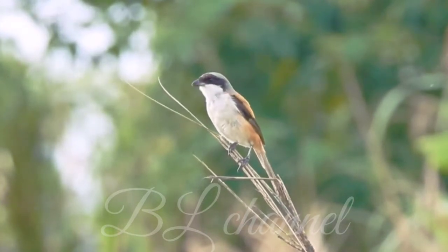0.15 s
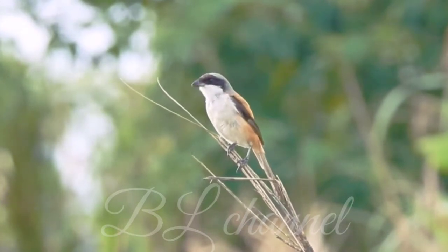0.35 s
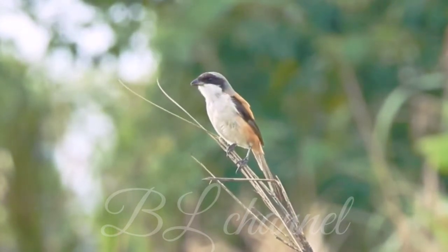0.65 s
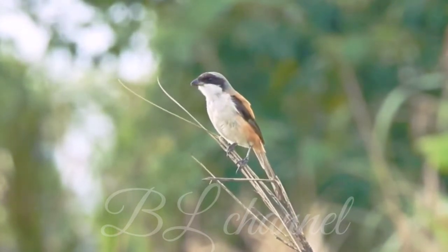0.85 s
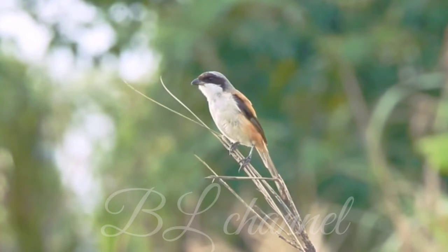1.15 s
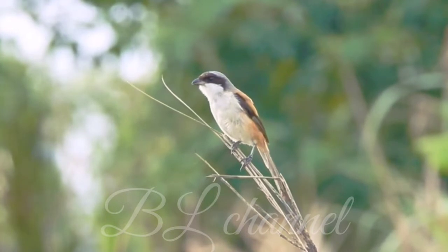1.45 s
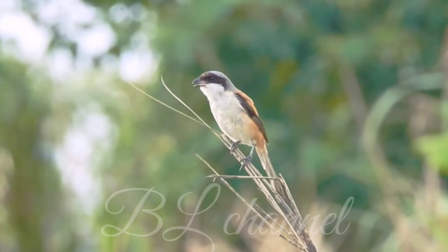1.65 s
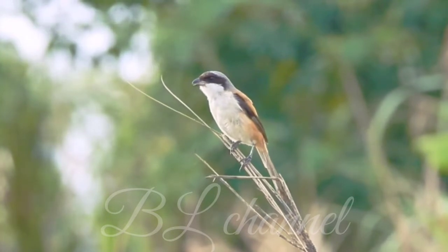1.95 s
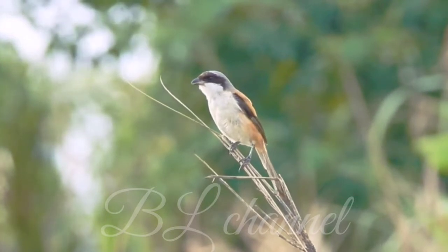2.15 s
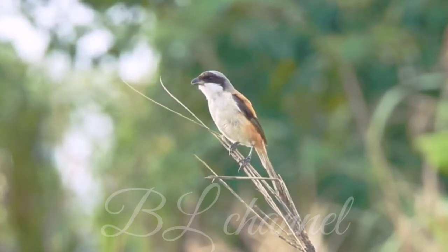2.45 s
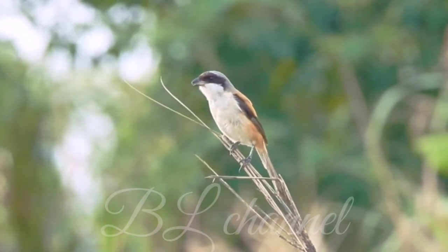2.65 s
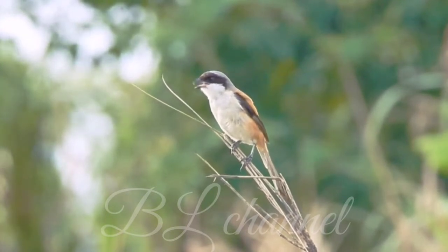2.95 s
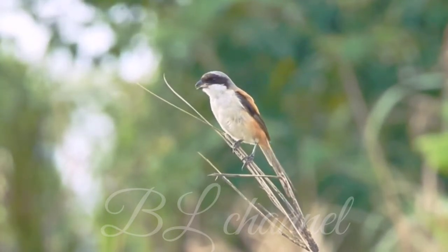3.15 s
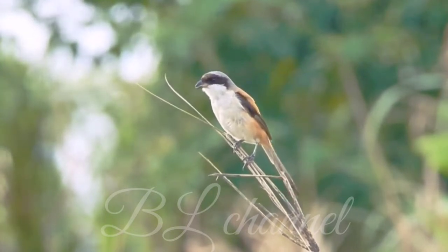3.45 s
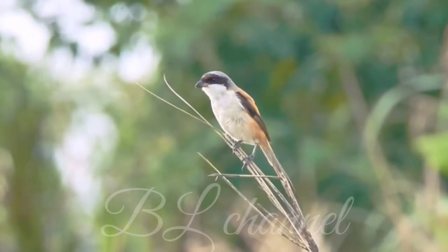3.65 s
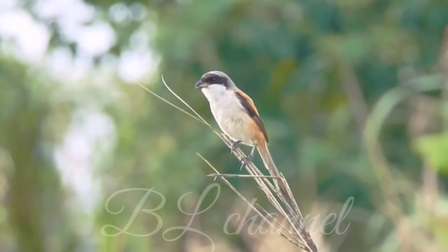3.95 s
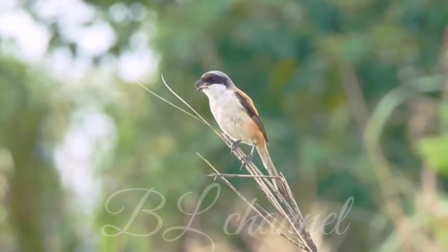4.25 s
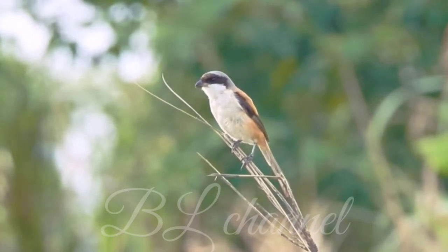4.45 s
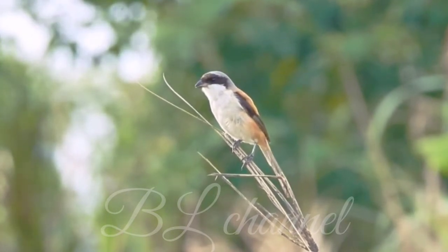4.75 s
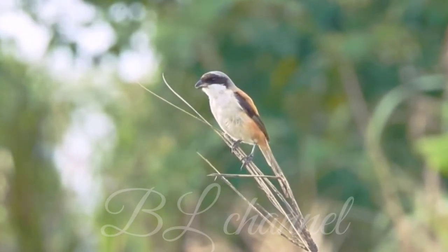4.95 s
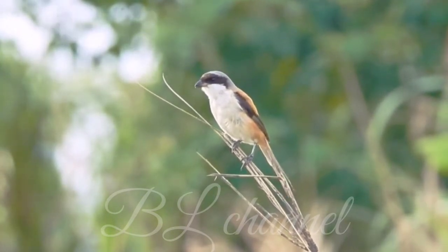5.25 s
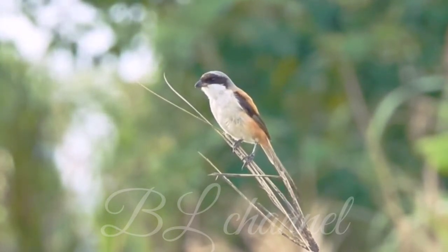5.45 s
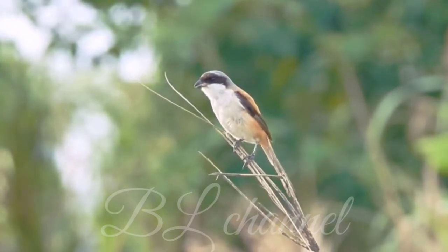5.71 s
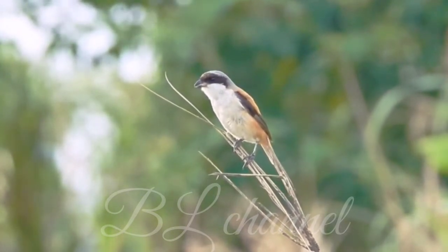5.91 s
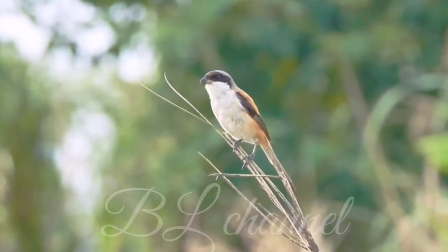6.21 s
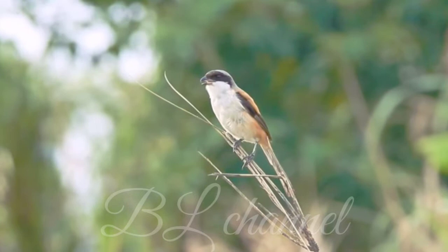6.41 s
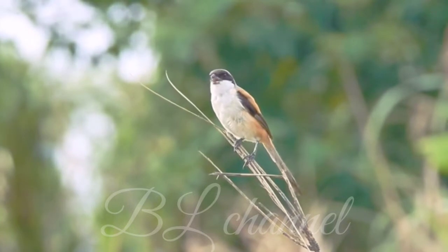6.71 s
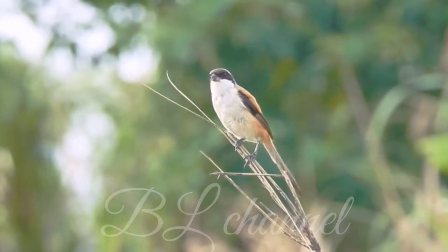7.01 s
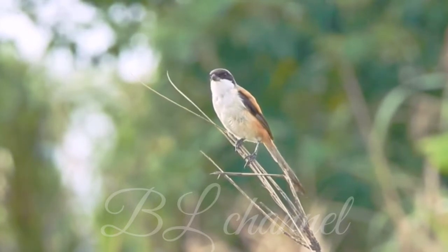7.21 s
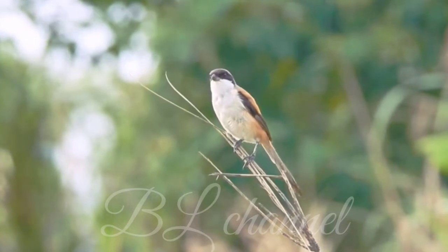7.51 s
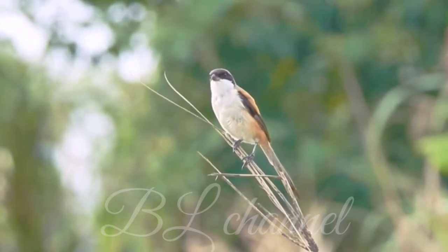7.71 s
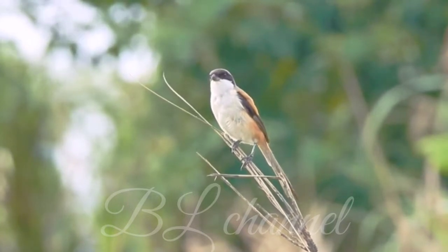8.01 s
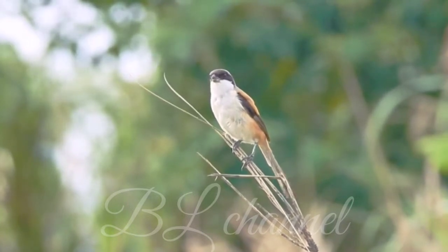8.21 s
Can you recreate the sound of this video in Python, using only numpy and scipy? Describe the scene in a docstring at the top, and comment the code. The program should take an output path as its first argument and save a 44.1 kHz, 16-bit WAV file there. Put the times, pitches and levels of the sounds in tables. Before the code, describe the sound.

A perched bird chatters in quick, varied, scratchy notes, while another small bird ticks faintly far off amid soft hiss, low rumble and insect trill.

```python
"""A steady outdoor hiss and rumble with insects comes first; then a small bird ticks far off as a shrike sings.
The shrike, on a dry stalk, runs through slurs, whistles, nasal chirps, rasps and hard rattles.
The two sides of its syrinx pulse the airflow alone or together; throat and beak pick out one region of partials.
The far bird and fainter low pips are short gliding sines; insects are pulsed tones and resonant noise.
Foliage scatters a faint tail from the birds, and one microphone feeds both channels."""
import sys
import numpy as np
from scipy import signal
from scipy.fft import rfft, irfft, next_fast_len
from scipy.io import wavfile
from scipy.ndimage import uniform_filter1d

SR = 44100
rng = np.random.default_rng(int(sys.argv[2]) if len(sys.argv) > 2 else 0)


def master(y):
    """Save y as 16-bit WAV."""
    cut = np.clip(np.atleast_2d(y).T, -1, 1)
    pcm = np.round(cut * 32767)  # scale
    wavfile.write(sys.argv[1], SR, pcm.astype(np.int16))


N = 369116

# Levels in the note tables come before each note's own shaping.
# Falling slurs from one side of the syrinx: start_s, length_s, level_db, last_pitch_hz, quick_drop_hz,
# drop_time_s, slow_sag_hz_per_s, catches_after_s, thins_after_s
FALLING_SLURS = [(0.274, 0.165, -39.5, 881, 745, 0.047, 298, 0.045, 0.069),
                 (0.704, 0.182, -42, 903, 458, 0.026, 1830, 0.049, 0.091)]
# Hooks that start hoarse, clear and flick upward: start_s, length_s, turn_after_s, level_db,
# lowest_pitch_hz, last_pitch_hz, first_roughness (relative)
UPWARD_HOOKS = [(3.323, 0.056, 0.024, -37.5, 1142, 1870, 0.76),
                (6.861, 0.083, 0.042, -36, 1147, 1790, 1.09)]
# Almost pure whistles that climb and plunge: start_s, length_s, attack_s, level_db,
# first_pitch_hz, ceiling_pitch_hz, plunge_after_s, upward_leap_hz
PURE_WHISTLES = [(1.097, 0.148, 0.03, -39.5, 2624, 3445, 0.128, 1),
                 (4.393, 0.17, 0.032, -39.5, 2980, 3515, 0.139, 286)]
# Nasal two-voiced chirps: start_s, length_s, level_db, swell_db, low_voice_hz, low_crest (0-1 of length),
# high_voice_hz, high_crest (0-1 of length), pitch_bend (share per squared length), first_beak_hz, last_beak_hz,
# base_roughness (0-1), breaks_after_s, break_change_db
NASAL_CHIRPS = [ (1.726, 0.07, -44, 3, 1203, 0.27, 1677, 0.51, 0.4, 4630, 3650, 0.17, 0.039, -4),
                (2.41, 0.127, -42.5, -2, 1220, 0.59, 2340, 0.75, 0.37, 3980, 3480, 0.18, 0.045, -8),
                (2.997, 0.084, -44.5, 11, 1320, 0.18, 1900, 0.52, 0.25, 5200, 4630, 0.26, 0.037, -2),
                (3.688, 0.12, -45, 6, 1350, 0.5, 2195, 0.62, 0.36, 3930, 3070, 0.16, 0.043, -7),
                (4.788, 0.13, -44.5, 2, 1357, 0.53, 2315, 0.65, 0.43, 4100, 3500, 0.16, 0.031, -4),
                (5.116, 0.082, -40.5, 13, 1342, 0.49, 1963, 0.47, 0.5, 4240, 4060, 0.22, 0.033, -2),
                (5.902, 0.123, -39, 6.5, 1320, 0.52, 2352, 0.7, 0.36, 3750, 2860, 0.13, 0.0877, -3),
                (6.525, 0.085, -41, 4, 1543, 0.22, 1948, 0.42, 0.62, 6060, 3740, 0.19, 0.0544, 2.5),
                (8.005, 0.058, -38.5, 0, 1311, 0.72, 2610, 0.65, 0.55, 4800, 3500, 0.29, 0.019, -2), ]
# Loud rattles that smooth out into a chirp: start_s, length_s, trill_lasts_s, first_beat_s, first_level_db,
# trill_level_db, chirp_level_db, first_beak_hz, trill_beak_hz, chirp_beak_hz, last_low_voice_hz, last_high_voice_hz
HARD_RATTLES = [ (1.377, 0.161, 0.088, 0.0094, -39, -34, -36, 3400, 4030, 3580, 1275, 1740),
                (2.659, 0.152, 0.097, 0.00806, -42.5, -37, -36.5, 4200, 4470, 3980, 1180, 1745),
                (3.968, 0.147, 0.085, 0.009, -44.5, -36, -35, 2700, 4800, 4230, 1210, 1790),
                (6.178, 0.138, 0.085, 0.00868, -40, -34.5, -36, 4080, 4600, 3830, 1204, 2480), ]
# Loudness curve of each long hoarse rasp: time_s, level_db
RASP_LOUDNESS = [
    [(1.87, -78), (1.896, -47.5), (1.968, -54.5), (1.994, -47), (2.222, -50.5), (2.226, -54), (2.29, -47),
     (2.306, -70), (2.32, -66)],
    [(3.21, -66), (3.228, -52.5), (3.29, -49), (3.31, -54), (3.328, -46)],
    [(5.3, -73), (5.332, -49.5), (5.522, -49.5), (5.6, -42), (5.688, -51.5), (5.72, -49), (5.746, -57),
     (5.786, -51), (5.82, -66)],
    [(6.76, -66), (6.782, -51.5), (6.838, -46.5), (6.856, -55), (6.858, -52)],
]
# Mean beak resonance of each rasp: beak_hz
RASP_BEAKS = [3540, 3300, 3830, 3070]
# Colour of the shrike's throat: frequency_hz, gain_db
THROAT_COLOUR = [(550, -27), (1100, -9.5), (1650, -8), (1900, -12.5), (2550, 0.5), (3100, -6), (3850, 3.5),
                 (4350, -4.5), (4950, 2), (5900, -6.5), (8000, -5.5), (9500, -13.5), (12000, -12),
                 (15500, -37)]
# The part of the voice that only an open beak radiates: frequency_hz, gain_db
OPEN_BEAK_TREBLE = [(4400, -27), (5300, -5.5), (6100, -2.5)]
# Runs of tiny downward chips from the far bird: first_chip_s, last_chip_s, mean_level_db
FAR_CHIP_RUNS = [(0.253, 0.383, -52.5), (0.815, .93, -56), (1.16, 1.2, -62), (1.334, 1.363, -59),
                 (1.856, 1.93, -51.5), (2.07, 2.11, -55), (3.248, 3.33, -54.5), (4.201, 4.355, -56.5),
                 (4.582, 4.785, -61), (5.717, 5.906, -54.5), (6.66, 6.7, -60), (6.984, 7.065, -58),
                 (7.307, 7.423, -57.5), (7.595, 7.635, -62)]
# Spectrum shape of the distant rumble: frequency_hz, relative_level_db
RUMBLE_COLOUR = [(12, -43), (20, -13), (117, -1.5), (210, -7.5), (370, -17), (399, -18.5), (604, -21),
                 (689, -22), (1190, -22), (1380, -26), (1800, -26.5), (2340, -42), (3960, -120)]
# Spectrum shape of the outdoor hiss: frequency_hz, relative_level_db
HISS_COLOUR = [(1500, -17.5), (2100, -7), (2650, 0.5), (3200, -3), (4200, -7.5), (5150, -1.5), (5850, -13),
               (6800, -9), (7600, -8), (8600, -19), (10200, -13.5), (11500, -25.5), (13000, -26),
               (15600, -27.5)]
# Echo of the foliage: frequency_hz, t60_s
FOLIAGE_DECAY = [(1000, 0.19), (4000, 0.23), (12000, 0.058)]

RUMBLE_DB, HISS_DB = -52.5, -53.77
EDGE_HZ = 15700
EDGE_DB = -22  # depth from which a shaped note rises and to which it dies; rasps follow their own curves

FALL_CURVE, FALL_ROUGH, FALL_THROAT_SHARE, FALL_START_DB = 1.3, 0.15, 0.48, -12.5
CATCH_S, CATCH_ROUGH, THIN_S, THIN_DB = 0.012, 0.25, 0.015, -10
FALL_LEAK_DB, FALL_START_LEAK_DB = -19, 14

HOOK_DIP, HOOK_CURVE, HOOK_ROUGH = 0.12, 1.3, 0.14
HOOK_START_DB, HOOK_END_DB, HOOK_PEAK_LAG_S = -8.5, -19, 0.007
HOOK_BEAK_HZ, HOOK_BEAK_RISE_HZ, HOOK_LEAK_DB, HOOK_ROUGH_LEAK_DB = 2830, 900, -8.5, 12

CLIMB_S, PLUNGE_S, PLUNGE_SHARE, PLUNGE_SAG_PER_S, PLUNGE_DB = 0.043, 0.0053, 0.39, 16, -7
LEAP_LEAD_S, LEAP_DB_PER_HZ = 0.036, -0.0266
WHISTLE_ROUGH, PLUNGE_ROUGH, WHISTLE_BEAK_HZ = 0.12, 0.23, 3400
WEAK_HZ, WEAK_WIDTH_HZ, WEAK_DB = 3180, 125, -13  # a whistle fades as it climbs through this pitch
WHISTLE_FALL_DB, PLUNGE_FALL_DB, SCRAPE_S = 17, 6.5, 0.017  # the first two are dB lost per harmonic

CHIRP_ATTACK_S, CHIRP_RELEASE_S, CHIRP_EDGE_DB, CHIRP_EDGE_ROUGH = 0.012, 0.014, -4, 0.21
BREAK_S, BREAK_ROUGH, BREAK_BEAK_S, CHIRP_WAVER, CHIRP_WAVER_HZ = 0.0099, 0.22, 0.0073, 0.0087, 45
CHIRP_EARLY_ROUGH, CHIRP_LATE_SHARE = 0.071, 0.75  # a chirp is hoarser before its break and clears after it

TRILL_LOW_HZ, TRILL_HIGH_HZ, TRILL_HIGH_SAG_PER_S = 1567, 2514, 1.0
SCOOP_S, SCOOP_PITCH = 0.017, 0.14  # width of the opening scoop and its share of the low pitch
SETTLE_S, SETTLE_SAG_PER_S, SETTLE_DB = 0.0075, 1.8, -2
TRILL_ROUGH, SETTLE_ROUGH, SMOOTH_ROUGH = 0.334, 0.29, 0.26  # before the trill's smoothing
RATTLE_ATTACK_S, RATTLE_RELEASE_S = 0.0022, 0.023
RATTLE_BEAK_WAVER, RATTLE_WAVER_HZ, RATTLE_WAVER_DB = 0.045, 69.6, 1.3

RASP_LOW_HZ, RASP_HIGH_HZ, RASP_ROUGH = 1252, 1640, 0.797
RASP_GRAIN_DB, RASP_GRAIN_HZ, RASP_FOCUS, RASP_LEAK_DB = 1.7, 220, 1.4, -4
RASP_BEAK_WAVER, RASP_PITCH_WAVER, RASP_WAVER_HZ = 0.076, 0.0182, 18.1


def shrike():
    """All notes of the song, from the two sides of one syrinx."""
    song = np.zeros(N)
    notes = [(fall, FALLING_SLURS), (hook, UPWARD_HOOKS), (whistle, PURE_WHISTLES),
             (chirp, NASAL_CHIRPS), (rattle, HARD_RATTLES)]
    for note, table in notes:
        for start_s, *settings in table:
            add(song, start_s, note(*settings))
    for loudness, beak_hz in zip(RASP_LOUDNESS, RASP_BEAKS):
        add(song, loudness[0][0], rasp(loudness, beak_hz))
    return song


def fall(length, db, last_hz, drop_hz, drop_s, sag_hz_per_s, catch_s, thin_s):
    """Pitch drops, catches hoarsely, thins and sags; the beak follows harmonic 3, swelling on throat resonances."""
    t = np.arange(0, length, 1 / SR)
    high = np.exp(-(t / drop_s) ** FALL_CURVE)
    hz = last_hz + drop_hz * high + sag_hz_per_s * (length - t)
    beak_hz = 3 * hz
    rough = FALL_ROUGH + CATCH_ROUGH * bump(t, catch_s, CATCH_S)
    level_db = db + FALL_THROAT_SHARE * read(THROAT_COLOUR, beak_hz) + FALL_START_DB * high ** 2
    level_db = level_db + THIN_DB * bump(t, thin_s, THIN_S)
    level_db = level_db + edges_db(t, attack_s=0.0048, release_s=0.012)
    # rich at first, nearly pure at the end
    leak_db = FALL_LEAK_DB + FALL_START_LEAK_DB * (1 - switch(t, thin_s, THIN_S))
    flow = valve(hz, rough, fall_db=3)
    return voice(flow, rough, level_db, beak_hz, beak_width=110, leak_db=leak_db, air_db=0)


def hook(length, turn_s, db, lowest_hz, last_hz, first_rough):
    """A hoarse start clears as the pitch dips; loudest just after the turn, it fades as it flicks up."""
    t = np.arange(0, length, 1 / SR)
    before = np.maximum(1 - t / turn_s, 0)
    after = np.maximum((t - turn_s) / (length - turn_s), 0)
    hz = blend(lowest_hz, last_hz, after ** HOOK_CURVE) * (1 + HOOK_DIP * before)
    rough = blend(HOOK_ROUGH, first_rough, np.sqrt(before))
    before_peak = np.maximum(1 - t / (turn_s + HOOK_PEAK_LAG_S), 0)
    level_db = db + HOOK_START_DB * np.sqrt(before_peak) + HOOK_END_DB * after ** 2
    level_db = level_db + edges_db(t, attack_s=0.0072, release_s=0.003)
    beak_hz = HOOK_BEAK_HZ + HOOK_BEAK_RISE_HZ * (np.sqrt(before) + after ** 2)
    leak_db = HOOK_LEAK_DB + HOOK_ROUGH_LEAK_DB * rough
    flow = valve(hz, rough, fall_db=4)
    return voice(flow, rough, level_db, beak_hz, beak_width=250, leak_db=leak_db, air_db=-1)


def whistle(length, attack_s, db, first_hz, top_hz, plunge_s, leap_hz):
    """The pitch climbs to a ceiling, may leap to a thinner register, then plunges with a brief scrape."""
    t = np.arange(0, length, 1 / SR)
    climb_hz = blend(top_hz, first_hz, np.exp(-t / CLIMB_S))
    leapt_hz = leap_hz * switch(t, plunge_s - LEAP_LEAD_S, width=0.001)
    plunge = switch(t, plunge_s, PLUNGE_S)
    sag = np.exp(-PLUNGE_SAG_PER_S * np.maximum(t - plunge_s, 0))
    hz = (climb_hz + leapt_hz) * (1 - PLUNGE_SHARE * plunge) * sag
    scrape = bump(t, plunge_s, SCRAPE_S)
    rough = WHISTLE_ROUGH + PLUNGE_ROUGH * scrape
    level_db = db + WEAK_DB * bump(climb_hz, WEAK_HZ, WEAK_WIDTH_HZ) + PLUNGE_DB * plunge ** 2
    level_db = level_db + LEAP_DB_PER_HZ * leapt_hz * (1 - plunge) * (1 - scrape)
    level_db = level_db + edges_db(t, attack_s, release_s=0.0046)
    flow = valve(hz, rough, blend(WHISTLE_FALL_DB, PLUNGE_FALL_DB, plunge))
    beak_hz = blend(hz, WHISTLE_BEAK_HZ, plunge ** 2)
    return voice(flow, rough, level_db, beak_hz, beak_width=1200, leak_db=-17, air_db=7)


def chirp(length, db, swell_db, low_hz, low_crest, high_hz, high_crest, bend,
          first_beak_hz, last_beak_hz, rough, break_s, break_db):
    """Both voices arch in pitch; the beak closes as the voice breaks briefly. The ends are soft and rough."""
    t = np.arange(0, length, 1 / SR)
    u = t / length
    ends = (2 * u - 1) ** 2
    broken = bump(t, break_s, BREAK_S)
    closed = switch(t, break_s, BREAK_BEAK_S)
    rough = blend(rough + CHIRP_EARLY_ROUGH, rough * CHIRP_LATE_SHARE, closed)
    rough = rough + CHIRP_EDGE_ROUGH * ends ** 2 + BREAK_ROUGH * broken

    def arch(hz, crest):
        """One side's pitch, highest near its crest, with a small waver."""
        return hz * (1 - bend * (u - crest) ** 2 + CHIRP_WAVER * wander(len(t), CHIRP_WAVER_HZ))

    low = arch(low_hz, low_crest)
    high = arch(high_hz, high_crest)
    level_db = db + swell_db * (u - .5) + CHIRP_EDGE_DB * ends + break_db * broken
    level_db = level_db + edges_db(t, CHIRP_ATTACK_S, CHIRP_RELEASE_S)
    beak_hz = blend(first_beak_hz, last_beak_hz, closed)
    flow = two_voices(low, high, rough, low_fall_db=6.0, high_fall_db=5.5, jitter=0.1, jitter_hz=417, tear=2.5)
    return voice(flow, rough, level_db, beak_hz, beak_width=700, leak_db=-8.5, air_db=2)


def rattle(length, trill_s, first_beat, first_db, trill_db, chirp_db, first_beak_hz, trill_beak_hz,
           chirp_beak_hz, last_low_hz, last_high_hz, trill_hz=57, swing=.08, dip_db=7, beak_swing=0.017):
    """A trill lifts pitches, beak and level on each beat, rough between; it settles into a sagging chirp."""
    t = np.arange(0, length, 1 / SR)
    depth = 1 - switch(t, trill_s, SETTLE_S)  # 1 in the trill, 0 in the chirp
    scoop = np.exp(-(t / SCOOP_S) ** 2)
    settling = np.sin(np.pi * depth)
    sag = 1 + SETTLE_SAG_PER_S * (length - t)
    slack = depth * (1 - np.cos(2 * np.pi * trill_hz * (t - first_beat))) / 2  # 0 on a beat
    low_hz = blend(last_low_hz * sag, TRILL_LOW_HZ, depth) * (1 - SCOOP_PITCH * scoop)
    high_hz = blend(last_high_hz * sag, TRILL_HIGH_HZ * (1 - TRILL_HIGH_SAG_PER_S * t), depth)
    beak_hz = blend(chirp_beak_hz, blend(trill_beak_hz, first_beak_hz, scoop), depth)
    beak_hz = beak_hz * (1 - beak_swing * slack + RATTLE_BEAK_WAVER * wander(len(t), RATTLE_WAVER_HZ))
    rough = blend(SMOOTH_ROUGH, TRILL_ROUGH, depth) + SETTLE_ROUGH * settling
    rough = rough * (1 - 0.28 * depth) + 0.57 * slack
    low = valve(low_hz * (1 - swing * slack), rough, fall_db=4.5, jitter=0.1378, jitter_hz=472)
    high = valve(high_hz * (1 - swing * slack), rough, fall_db=3.0, jitter=0.0666, jitter_hz=460)
    level_db = blend(chirp_db, blend(trill_db, first_db, scoop), depth)
    level_db = level_db + SETTLE_DB * settling + dip_db * (depth / 2 - slack)
    level_db = level_db + RATTLE_WAVER_DB * wander(len(t), RATTLE_WAVER_HZ)
    level_db = level_db + edges_db(t, RATTLE_ATTACK_S, RATTLE_RELEASE_S)
    return voice(low * high, rough, level_db, beak_hz, beak_width=830, leak_db=-11.5, air_db=-3)


def rasp(loudness, mean_beak_hz):
    """Two very rough, grainy, wavering voices; the louder they get, the more the beak resonance stands out."""
    times_s, levels_db = np.transpose(loudness)
    t = np.arange(times_s[0], times_s[-1], 1 / SR)
    level_db = np.interp(t, times_s, levels_db)
    waver = 1 + RASP_PITCH_WAVER * wander(len(t), RASP_WAVER_HZ)
    beak_hz = mean_beak_hz * (1 + RASP_BEAK_WAVER * wander(len(t), RASP_WAVER_HZ))
    leak_db = RASP_LEAK_DB - RASP_FOCUS * np.maximum(level_db - np.median(level_db), 0)
    grain_db = RASP_GRAIN_DB * wander(len(t), RASP_GRAIN_HZ)
    flow = two_voices(RASP_LOW_HZ * waver, RASP_HIGH_HZ * waver, RASP_ROUGH, low_fall_db=4.5,
                      high_fall_db=10.5, jitter=.07, jitter_hz=348, tear=1.2)
    return voice(flow, RASP_ROUGH, level_db + grain_db, beak_hz, beak_width=330, leak_db=leak_db, air_db=-6)


def two_voices(low_hz, high_hz, rough, low_fall_db, high_fall_db, jitter, jitter_hz, tear, beat_db=-14):
    """Both sides modulate one airstream: sums of their harmonics sound too, and faintly the beats between them."""
    low = valve(low_hz, rough, low_fall_db, jitter, jitter_hz, tear)
    high = valve(high_hz, rough, high_fall_db, jitter, jitter_hz, tear)
    beats = np.conj(low - 1) * (high - 1)
    return low * high + gain_of(beat_db) * beats


def valve(hz, rough, fall_db, jitter=0.084, jitter_hz=420, tear=8.7, tear_hz=260):
    """Airflow through one side of the syrinx: a steady part and harmonics of a jittering pitch."""
    size = len(hz)
    phase = 2 * np.pi * np.cumsum(hz * (1 + jitter * rough * wander(size, jitter_hz))) / SR
    torn = np.minimum(tear * rough ** 2, 1)  # roughness tears the harmonics apart, up to a limit
    flow = np.ones(size, complex)
    for k in range(1, 7):
        lag = np.pi * k * k / 5  # higher harmonics trail behind, so the pulses stay blunt
        lag = lag + torn * wander(size, tear_hz)
        harmonic = gain_of(-fall_db * k) * np.exp(1j * (k * phase - lag))
        flow = flow + harmonic * (k * hz < SR / 3)
    return flow


def voice(flow, rough, level_db, beak_hz, beak_width, leak_db, air_db,
          shimmer_db=4.0, gape_db=30, gape_hz=4100):
    """Flow and turbulence pass the throat and the moving beak resonance, then take the note's level."""
    turbulence = evened(np.sqrt(abs(flow))) * rng.standard_normal(len(flow))  # air rushes with the flow
    drive = evened(flow.real - 1) + gain_of(air_db) * rough * turbulence
    drive = drive * gain_of(shimmer_db * rough * wander(len(flow), 950))  # a rough voice sputters
    throat = coloured(drive, THROAT_COLOUR)
    treble = coloured(throat, OPEN_BEAK_TREBLE)
    # a wider beak resonates higher and lets more treble out
    gape = gain_of(np.clip(gape_db * np.log2(beak_hz / gape_hz), -7, 12))
    throat = throat + (gape - 1) * treble
    sound = resonate(throat, beak_hz, beak_width) + gain_of(leak_db) * throat
    power = uniform_filter1d(sound ** 2, size=400)
    levelled = gain_of(level_db) * sound / np.sqrt(abs(power) + 1e-12)
    return levelled * signal.windows.tukey(len(sound), .03)


def far_bird(top_hz=4950, bottom_hz=4150, length=0.033):
    """A small bird far off: runs of evenly spaced chips, each a short falling sine."""
    gap_s = .04  # nominal; each run spreads its chips evenly between first and last
    t = np.arange(0, length, 1 / SR)
    out = np.zeros(N)
    phase = 2 * np.pi * np.cumsum(np.linspace(top_hz, bottom_hz, len(t))) / SR
    chip = np.sqrt(2) * np.hanning(len(t)) * np.sin(phase)
    for first, last, db in FAR_CHIP_RUNS:
        for s in np.linspace(first, last, round(abs(last - first) / gap_s) + 1):
            add(out, s - length / 2, gain_of(db + rng.standard_normal()) * chip)
    return out


def far_pips(db=-66, tone_hz=1220, spread_hz=70, length=0.065, arch=0.071):
    """Soft low arched sines from birds much farther away, at random moments."""
    t = np.arange(0, length, 1 / SR)
    out = np.zeros(N)
    for when, pitch, size in rng.random(size=(30, 3)):
        crest_hz = tone_hz + spread_hz * (2 * pitch - 1)
        hz = crest_hz * (1 + arch * (np.sin(np.pi * t / length) - 1))
        pip = np.hanning(len(t)) * np.sin(2 * np.pi * np.cumsum(hz) / SR)
        add(out, when * N / SR, gain_of(db + 4.5 * size) * pip)
    return out


def insects(trill_db=-62, trill_tone_hz=6650, chorus_db=-64, chorus_hz=6620,
            chirp_db=-70, chirp_tone_hz=7300):
    """One insect trills stroke by stroke over a far chorus of its kind; a higher one chirps in short groups."""
    stroke_hz, pulse_hz, phrase_hz = 42.4, 22, 4.4
    t = np.arange(N) / SR
    stroke = (stroke_hz * t + 0.15 * wander(N, 3.7)) % 1
    tone_hz = trill_tone_hz - 120 * (stroke - .5) + 50 * wander(N, 292)  # each wing stroke sags in pitch
    trill = np.sin(np.pi * stroke) ** 4 * np.sin(2 * np.pi * np.cumsum(tone_hz) / SR)
    trill = trill * gain_of(2 * wander(N, 15))
    chorus = resonate(resonate(rng.standard_normal(N), chorus_hz, 420), chorus_hz, 420)
    pulses = np.sin(np.pi * pulse_hz * t) ** 2
    groups = pulses * np.sin(np.pi * phrase_hz * t + 0.52 * wander(N, 0.99)) ** 2
    chirps = groups * np.sin(2 * np.pi * np.cumsum(chirp_tone_hz + 45 * wander(N, 220)) / SR)
    return gain_of(trill_db) * evened(trill) + gain_of(chorus_db) * evened(chorus) + gain_of(chirp_db) * evened(chirps)


def background():
    """Low distant rumble and a broad hiss, both filtered noise that barely swells."""
    rumble = evened(coloured(rng.standard_normal(N), RUMBLE_COLOUR))
    rumble = rumble * gain_of(RUMBLE_DB + .5 * wander(N, 6.9))
    hiss = evened(coloured(rng.standard_normal(N), HISS_COLOUR))
    hiss = hiss * gain_of(HISS_DB + 0.14 * wander(N, 2.3))
    return rumble + hiss


def foliage(x):
    """Leaves and ground scatter a short tail: noise that dies at its own rate in each band."""
    hz, t, noise = signal.stft(rng.standard_normal(SR // 2), SR, nperseg=256)
    decay = gain_of(-60 * t / read(FOLIAGE_DECAY, hz)[:, None])
    tail = signal.istft(noise * decay, SR, nperseg=256)[1]
    return signal.fftconvolve(x, tail / np.linalg.norm(tail))[:N]


def gain_of(db):
    """Decibels to amplitude."""
    return 10 ** (np.asarray(db) / 20)


def evened(x):
    """Scales to rms 1."""
    return x / np.sqrt(np.mean(x ** 2) + 1e-20)


def read(points, hz):
    """Reads a table on a log-frequency axis."""
    f, value = np.transpose(points)
    return np.interp(np.log(hz + 1), np.log(f + 1), value)


def add(mix, s, sound):
    """Mixes a sound in at time s."""
    part = mix[max(round(s * SR), 0):][:len(sound)]
    part += sound[:len(part)]


def coloured(x, spectrum):
    """Filters by a table of frequency_hz, gain_db."""
    size = next_fast_len(len(x) + 512)
    gain = gain_of(read(spectrum, np.fft.rfftfreq(size, 1 / SR)))
    return irfft(rfft(x, size) * gain, size)[:len(x)]


def wander(size, rate_hz):
    """Smooth chance of rms about 1: noise rolled off around rate_hz."""
    length = next_fast_len(max(size, SR))
    hz = np.fft.rfftfreq(length, 1 / SR)
    smooth = rfft(rng.standard_normal(length)) * np.exp(-(hz / rate_hz) ** 2)
    return evened(irfft(smooth, length))[:size]


def resonate(x, hz, width):
    """A resonance of gain 1, width in Hz, that follows the curve hz."""
    turn = np.exp(2j * np.pi * np.cumsum(hz * np.ones(len(x))) / SR)
    r = np.exp(-np.pi * width / SR)
    # shift the resonance to 0 Hz, smooth, and shift back
    return 2 * (turn * signal.lfilter([1 - r], [1, -r], x / turn + 1e-18)).real


def blend(a, b, share):
    """Goes from a to b as share goes from 0 to 1."""
    return a + (b - a) * share


def switch(t, at, width):
    """A smooth step from 0 to 1 around the time at."""
    return (1 + np.tanh((t - at) / (2 * width))) / 2


def bump(t, at, width):
    """A smooth hump of height 1 around at."""
    return np.exp(-((t - at) / width) ** 2)


def edges_db(t, attack_s, release_s):
    """Attack, hold and release of a note, in dB."""
    attack = np.maximum(1 - t / attack_s, 0) ** 2
    release = np.maximum(1 - (t[-1] - t) / release_s, 0) ** 2
    return EDGE_DB * (attack + release)


def scene():
    """Shrike, far birds, their foliage tails, insects and air reach one microphone, alike in both channels."""
    song = shrike()
    far = far_bird() + far_pips()
    tails = gain_of(-18.5) * foliage(song) + gain_of(-6.5) * foliage(far)
    mono = song + far + tails + insects() + background()
    return np.array([mono, mono])


def record(dry):
    """The recorder's band limit: a steep low-pass at EDGE_HZ."""
    low_pass = signal.firwin(511, EDGE_HZ, window=("kaiser", 9), fs=SR)
    return signal.oaconvolve(dry, low_pass[None], "same")


dry = scene()
out = record(dry)
master(out)
```